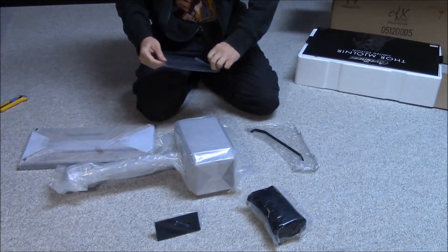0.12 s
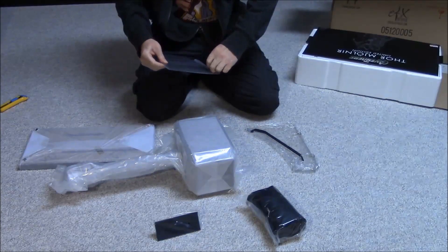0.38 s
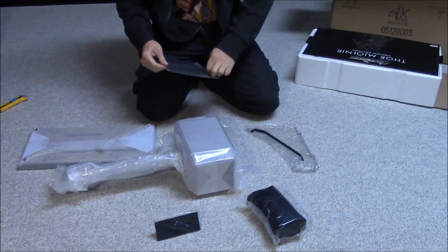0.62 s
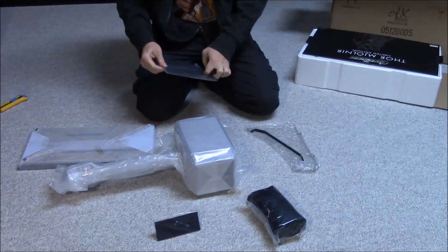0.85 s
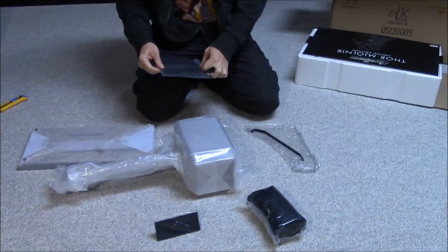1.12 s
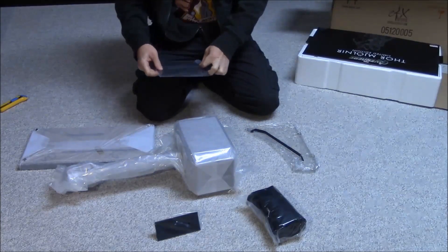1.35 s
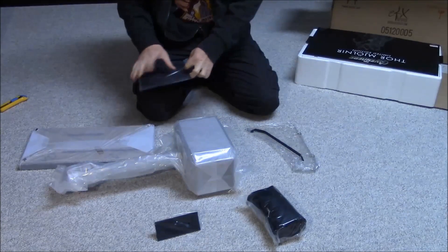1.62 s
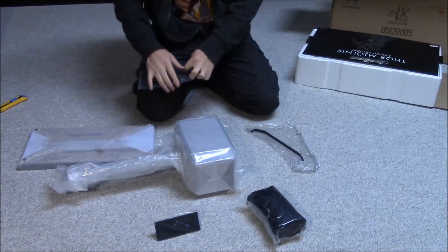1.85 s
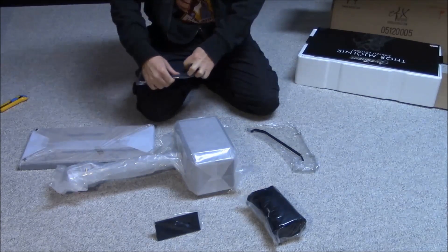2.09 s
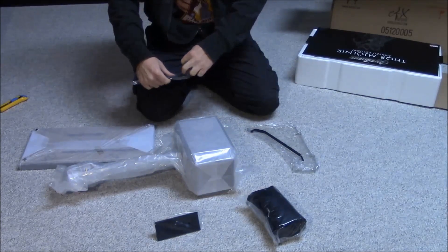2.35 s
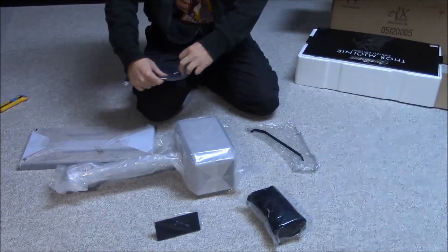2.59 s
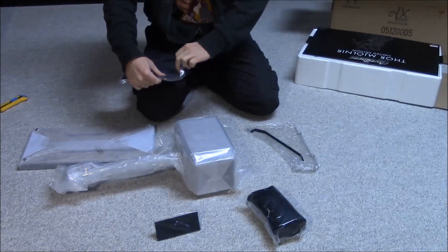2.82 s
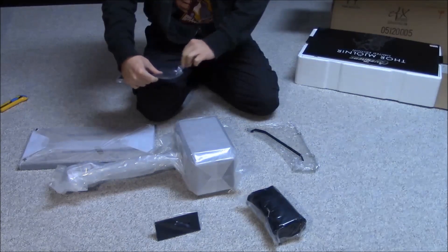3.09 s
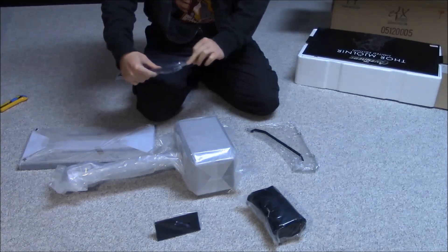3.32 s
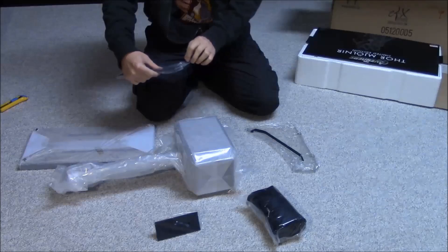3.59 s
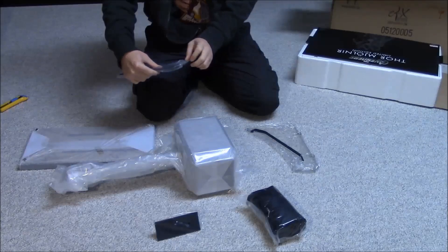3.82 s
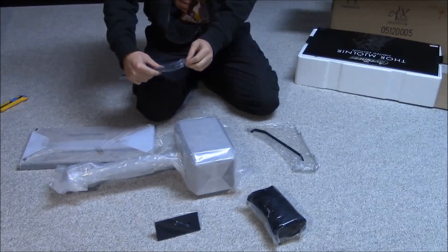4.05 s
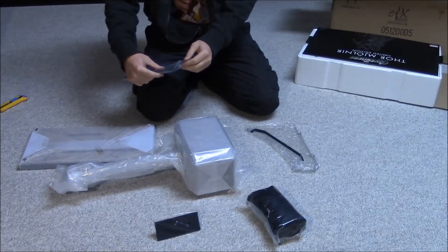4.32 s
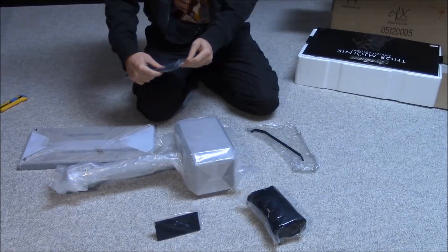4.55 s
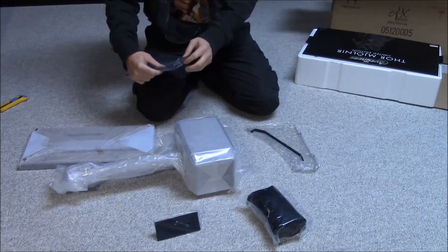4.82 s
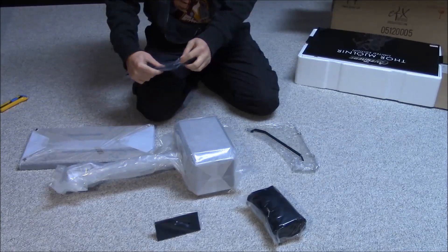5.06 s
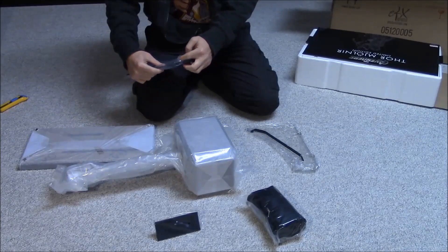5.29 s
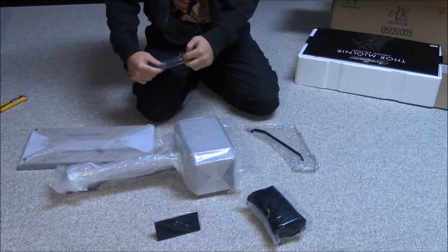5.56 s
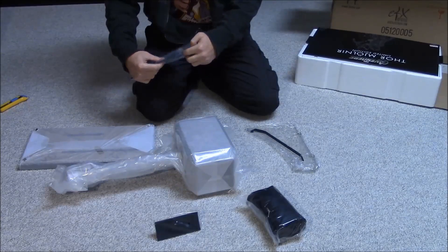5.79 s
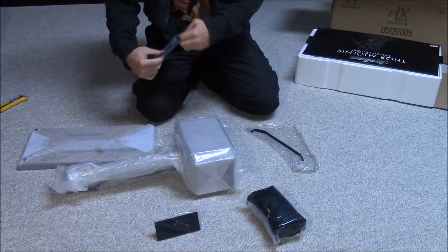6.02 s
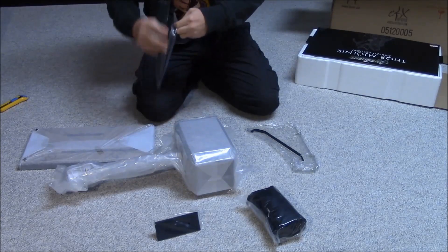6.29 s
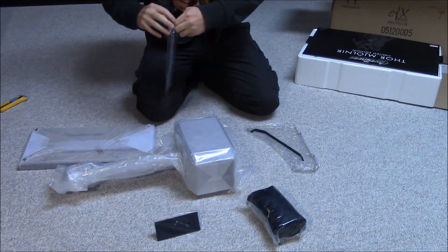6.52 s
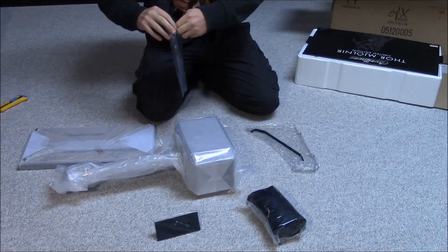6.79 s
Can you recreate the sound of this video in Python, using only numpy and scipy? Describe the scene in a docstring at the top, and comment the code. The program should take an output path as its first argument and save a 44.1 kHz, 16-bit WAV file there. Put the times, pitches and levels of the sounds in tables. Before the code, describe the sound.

Close stereo pickup of hands working a stiff plastic sleeve in a small, quiet carpeted room. Crisp separate snaps grow stronger, peak in a dense, bright crackling burst just after two seconds, then drop to soft dull crumples and light rustle. A small flurry of gentle crinkles returns near the end. A faint steady hush with a slight fuzzy whistling tone lies beneath.

```python
"""Sharp snaps and a papery rustle are heard over a steady hush with two fuzzy whistles, in a small quiet room.
Hands turn and peel a stiff plastic sleeve with papers in it, kneeling on carpet before a close microphone pair.
Each snap is a crease letting go: a gritty force pulse excites the ring of the film and the sleeve's low modes.
Rustle is filtered random ticks in clumps; floor, walls and ceiling return echoes and a dense tail.
The hush is shaped noise, partly alike at left and right."""
import sys
import numpy as np
from scipy import signal
from scipy.fft import rfft, irfft
from scipy.io import wavfile
from scipy.ndimage import uniform_filter1d

SR = 44100
rng = np.random.default_rng(int(sys.argv[2]) if len(sys.argv) > 2 else 0)


def amplitude_ratio(level_db):
    """Convert a level in decibels to the matching linear amplitude (field) ratio."""
    exponent = np.asarray(level_db, float) / 20
    return 10 ** exponent


def to_wav(sig):
    """Store sig (one row per channel, or 1-D mono) as 16-bit WAV at the path in sys.argv[1].

    Samples outside -1..1 are clipped; the rate is SR.
    """
    pcm = np.clip(np.atleast_2d(sig), -1, 1) * 32767
    pcm = np.round(pcm).astype(np.int16)
    wavfile.write(sys.argv[1], SR, pcm.T)  # frames by channels


N = 304290  # length in samples


def unit_rms(x):
    """Normalisation by mean power: scales to rms 1."""
    return x / np.sqrt(np.mean(x ** 2) + 1e-20)


def unit_peak(x):
    """Normalisation by amplitude: scales each row to peak 1."""
    return x / abs(x).max(-1, keepdims=True)


def match_energy(x, other):
    """Energy equality: gives each row of x the energy of the same row of other."""
    return x * np.linalg.norm(other, axis=1, keepdims=True) / np.linalg.norm(x, axis=1, keepdims=True)


def read(points, hz):
    """Interpolation along log frequency, clamped at the ends of the table."""
    table_hz, value = np.transpose(points)
    return np.interp(np.log(hz + 1), np.log(table_hz + 1), value)


def colour(x, spectrum):
    """Minimum-phase filtering: the log gain fixes the phase of a causal response."""
    log_gain = np.log(amplitude_ratio(read(spectrum, abs(np.fft.fftfreq(2048, 1 / SR)))))
    response = np.exp(np.conj(signal.hilbert(log_gain)))
    taps = np.fft.ifft(response).real[:1024]
    return signal.oaconvolve(x, taps[None], axes=1)[:, :x.shape[1]]


def pair(x, likeness):
    """Interaural coherence: mixes two unrelated signals into a left and right alike by frequency."""
    a, b = rfft(x)
    same = np.clip(read(likeness, np.fft.rfftfreq(x.shape[1], 1 / SR)), 0, 1)
    mid = np.sqrt((1 + same) / 2) * a
    side = np.sqrt((1 - same) / 2) * b
    return irfft(np.array([mid + side, mid - side]), x.shape[1])


# Spectrum of the room hush. Each row: frequency in Hz, relative density in dB.
HUSH_SPECTRUM = [(25, -20), (60, -18.5), (120, -4), (270, -3.5), (460, -5), (700, -7), (1160, -12),
                 (2000, -13.5), (5700, -20.5), (11300, -27.5), (15600, -36), (15900, -63)]
# Fuzzy lines over the hush. Each row: centre in Hz, width in Hz, amplitude added re the hush there in dB.
WHISTLE_LINES = [(952, 40, 12), (1630, 30, 4)]
# Coherence of the hush. Each row: frequency in Hz, left-right likeness from 0 to 1.
HUSH_LIKENESS = [(60, 0.04), (180, 0.3), (550, 0.36), (1650, 0.75), (4970, 0.62), (15000, 0.83)]
HUSH_DB = -63  # rms


def hush():
    """Stationary noise: white noise takes the hush spectrum, raised by two resonance-shaped lines."""
    hz = np.fft.rfftfreq(N, 1 / SR)
    lift = 1 + sum(amplitude_ratio(db) / (1 + ((hz - centre) / (width / 2)) ** 2) for centre, width, db in WHISTLE_LINES)
    white = rng.standard_normal((2, N))
    noise = irfft(rfft(white) * amplitude_ratio(read(HUSH_SPECTRUM, hz)) * lift, N)
    return amplitude_ratio(HUSH_DB) * unit_rms(pair(noise, HUSH_LIKENESS))


# Fingers shift their grip. Each row: time of the peak in seconds, length in seconds,
# then gains in dB of the flexing of the whole sleeve, the rustle and the fizz.
GRIP_SHIFTS = [(0.142, .1, -64.5, -77, -87), (0.45, .25, -82, -63.5, -62), (0.743, .12, -77, -61, -66),
               (0.853, .06, -62, -64.5, -84), (1.134, .08, -66, -60, -84), (1.669, .08, -62.5, -70.5, -65),
               (1.962, .1, -57.5, -67.5, -79), (2.082, .06, -65.5, -61.5, -65),
               (2.192, .12, -54.5, -54.5, -48), (2.566, 0.088, -53.5, -80, -61),
               (2.681, .1, -55.5, -73, -62), (2.87, .07, -81, -75, -66), (3.016, .08, -59, -75, -70),
               (3.227, .12, -66, -68, -65.5), (3.348, .08, -57.5, -63, -81),
               (3.816, .12, -68.5, -77.5, -74), (4.461, 0.23, -83, -70, -68.5), (4.659, .2, -67, -73, -80),
               (5.3, .15, -69.5, -73, -72), (5.406, 0.065, -58.5, -78, -81),
               (5.594, .12, -65.5, -73.5, -79), (5.898, .2, -60, -72, -66), (6.109, .08, -58, -70, -80),
               (6.223, .1, -61, -62.5, -73), (6.4, .06, -60, -69.5, -82), (6.498, .1, -72, -67, -69),
               (6.805, .08, -72, -77, -69)]
# The hands are never quite still: steady gains in dB of the flexing, the rustle and the fizz.
HOLD_GAINS = (-71.5, -83.5, -97.5)
GRIP_FADE_DB, RISE_SHARE = 13, 0.6  # fade over one length; the same rise takes this share of it


def handling():
    """Power addition: grips that swell and fade exponentially add to a steady hold."""
    peak_s, length_s, *levels = np.transpose(GRIP_SHIFTS)[:, :, None]
    t = np.arange(0, N + 64, 64) / SR
    falling = (t - peak_s) / length_s
    rising = (peak_s - t) / (RISE_SHARE * length_s)
    shape = amplitude_ratio(-GRIP_FADE_DB * np.maximum(falling, rising))
    gains = [np.sqrt(amplitude_ratio(hold) ** 2 + ((amplitude_ratio(db) * shape) ** 2).sum(0)) for hold, db in zip(HOLD_GAINS, levels)]
    return [np.interp(np.arange(N) / SR, t, gain) for gain in gains]


# Colour of the rustle. Each row: frequency in Hz, relative gain in dB.
RUSTLE_COLOUR = [(600, -10), (1500, 3.5), (3000, 4), (6000, 3.5), (9000, -29)]
# Colour of the higher fizz. Each row: frequency in Hz, relative gain in dB.
FIZZ_COLOUR = [(4000, -22.5), (7000, 4.5), (10000, 5.5), (13000, -11), (16500, -59)]
# Colour of the bending sleeve. Each row: frequency in Hz, relative gain in dB.
FLEX_COLOUR = [(80, -37), (220, 12), (400, 0.5), (650, -5.5), (1100, -9.5), (2500, -25)]


def rustle(flex, rub, fizz):
    """Shot noise: tiny creases of uneven size clump under the fingers, with dull bumps as the sleeve bends."""
    chance, size, sign = rng.random((3, 2, N))
    drift = uniform_filter1d(rng.standard_normal(N), size=300)
    clumps = amplitude_ratio(3.9 * unit_rms(drift))
    per_s = np.array([[1200.], [250.]]) * clumps  # creases, bumps
    heights = amplitude_ratio(-4.2 * np.log(size + 0.0055))
    ticks = (chance < per_s / SR) * heights * np.sign(sign - .5)
    creases, bumps = ticks[:1], ticks[1:]
    rubbing = rub * unit_rms(colour(creases, RUSTLE_COLOUR))
    fizzing = fizz * unit_rms(colour(creases, FIZZ_COLOUR))
    bending = flex * unit_rms(colour(bumps, FLEX_COLOUR))
    return rubbing + fizzing + bending


# A loosely held sleeve crumbles rather than snaps. Each row: time in seconds, share of grit.
SLACKNESS = [(0, 0.069), (2.3, 0.092), (2.6, 0.87), (4.0, 1), (5.7, 0.98), (6.9, 0.72)]
# Low modes of the sleeve. Each row: nominal frequency in Hz, nominal level in dB, t60 in seconds.
SLEEVE_MODES = [(258.5, -12, 0.062), (361, -24, 0.06), (463, -5, 0.03), (646, 3, 0.026), (1024, -4, 0.0063),
                (1257, 6, 0.0081), (1880, 6.5, 0.0027)]
STRAIN_S = 0.0011  # the film strains this long before a crease lets go
RING_Q = 3.0  # sharpness of the film's ring
SLACK_DULLS = 0.6  # how much a fully slack film loses above its ring
# Share of a snap thrown into the room, and what a fully slack sleeve, muffled by the hands, takes from it.
THROWN_DB, THROWN_SLACK_DB = -1, -3.5


def snaps(table):
    """Impulse excitation: a strained crease lets go in a gritty spike, rings the film and knocks the sleeve."""
    s, db, ring_hz, thud_db, crack_db = np.transpose(table)[:, :, None]
    t = np.arange(2048) / SR - STRAIN_S  # time from the spike
    after = np.maximum(t, 0)
    grit = np.interp(s, *np.transpose(SLACKNESS))

    straining = 0.03 * np.exp(t / 0.00024)
    releasing = np.exp(-after / 0.0001) + grit * np.exp(-after / 0.0028)
    envelope = np.where(t < 0, straining, releasing)
    push = 0.69 * np.exp(-after / 0.00063)
    force = rfft(envelope * (push + rng.standard_normal((len(table), 2048))))

    j_hz = 1j * np.fft.rfftfreq(2048, 1 / SR)
    u, v = j_hz / ring_hz, j_hz / 8000
    resonance = u ** 2 / (1 + u / RING_Q + u ** 2)
    film = 0.0043 + resonance * u / (0.46 + u) / (1 + u / 1.46)  # steep below the ring, gentle above
    film = film / (1 + SLACK_DULLS * grit * u)
    edge = (v ** 2 / (1 + 0.96 * v + v ** 2)) ** 2  # the crack: high-pass at 8 kHz
    ring, crack = unit_peak(irfft(force * film)), unit_peak(irfft(force * edge))

    taut = np.log2(ring_hz / 3500)  # taut film favours the upper modes of the sleeve
    grip = rng.random((len(table), len(SLEEVE_MODES), 2, 1))  # the hold shifts the modes and their shares
    thud = 0
    for k, (mode_hz, mode_db, t60) in enumerate(SLEEVE_MODES):
        level = mode_db + 10.5 * taut * np.log2(mode_hz / 700) - 12.0 * grip[:, k, 1]
        held_hz = mode_hz * (0.871 + 0.22 * grip[:, k, 0])
        thud = thud + amplitude_ratio(level - 60 * after / t60) * np.sin(2 * np.pi * held_hz * after)
    thud = amplitude_ratio(thud_db) * unit_peak(thud)
    sound = amplitude_ratio(db) * (0.62 * ring + amplitude_ratio(crack_db) * crack + thud)

    # summed over all directions the grit evens out to a smooth colour: ring and crack add as powers
    body = 0.68 * rfft(match_energy(irfft(film), ring))
    top = amplitude_ratio(crack_db) * rfft(match_energy(irfft(edge[None]), crack))
    phase = 1j * np.angle(body) - 2 * np.pi * j_hz * STRAIN_S
    even = irfft(np.hypot(abs(body), abs(top)) * np.exp(phase))
    thrown = amplitude_ratio(db + THROWN_DB + THROWN_SLACK_DB * grit) * (even + thud)

    place = rng.standard_normal((len(table), 1))  # where on the sleeve, left to right
    sides = []
    for sign in (1, -1):  # left, right: level and arrival time differ
        lead = np.exp(2 * np.pi * j_hz * sign * place * 2.5e-6)
        sides.append(irfft(rfft(sound) * amplitude_ratio(sign * (0.66 + 0.3 * place)) * lead))
    out = np.zeros((3, N + 2048))
    starts = np.round(s[:, 0] * SR).astype(int)
    for at, rows in zip(starts, np.stack([*sides, thrown], axis=1)):
        out[:, at:at + 2048] += rows
    return out[:2, :N], out[2:, :N]


FAINT_COUNT = 60
FAINT_DB, FAINT_SPREAD_DB = -50, 8  # level of the loudest, range below it
FAINT_HZ, FAINT_OCTAVES = 2900, 0.4  # middle of the rings, scatter either way
FAINT_THUD_DB, FAINT_CRACK_DB = -13.5, -32  # middles, re the snap's level


def faint(busy):
    """Random point process: rows for faint snaps, likelier where the fingers are busy."""
    when, size, ring, thud, crack = rng.random((FAINT_COUNT, 5)).T
    rate = np.sqrt(busy)
    s = np.interp(when, np.cumsum(rate) / rate.sum(), np.arange(N) / SR)
    level = FAINT_DB - FAINT_SPREAD_DB * size
    ring_hz = FAINT_HZ * 2 ** (FAINT_OCTAVES * (2 * ring - 1))
    return np.transpose([s, level, ring_hz, FAINT_THUD_DB + 20 * (thud - .5), FAINT_CRACK_DB + 20 * (crack - .5)])


# First returns of floor, walls and ceiling. Each row: delay in seconds, nominal level in dB.
EARLY_ECHOES = [(.002, -7), (.0064, -8), (.0083, -16), (.0113, -11), (.0123, -13), (.0134, -14),
                (.0152, -15), (.0189, -16), (.0224, -16)]
# Decay of the tail. Each row: frequency in Hz, t60 in seconds.
DECAY_TIMES = [(200, 0.6), (500, 0.18), (1300, 0.41), (2200, .27), (3300, 0.3), (5000, 0.29), (9000, 0.22),
               (15000, 0.34)]
# What the surfaces return. Each row: frequency in Hz, gain in dB.
SURFACE_COLOUR = [(200, -5.5), (1000, 8.5), (4000, 1), (8000, -4.5), (15000, -22)]
# Coherence of the tail. Each row: frequency in Hz, left-right likeness from 0 to 1.
TAIL_LIKENESS = [(60, .05), (180, 0.29), (550, 1), (1650, 1), (3000, 1), (5500, 0.89), (15000, 0.55)]


def room(x):
    """Reverberation: single early reflections, then a dense tail that dies exponentially band by band."""
    length = SR // 2
    early = np.zeros((2, length))
    for delay, db in EARLY_ECHOES:
        early[:, round(delay * SR)] = amplitude_ratio(db + 0.88 * rng.standard_normal(2))  # each a little from one side
    taps = rng.standard_normal((2, length))
    hz, t, bands = signal.stft(pair(taps, TAIL_LIKENESS), SR, nperseg=128)
    decay = amplitude_ratio(-60 * t / read(DECAY_TIMES, hz)[:, None])
    tail = signal.istft(bands * decay, SR, nperseg=128)[1][:, :length]
    tail *= np.clip((np.arange(length) / SR - 0.003) / 0.006, 0, 1)  # builds up as echoes multiply
    back = colour(early + amplitude_ratio(-0.5) * tail / np.linalg.norm(tail[0]), SURFACE_COLOUR)
    return signal.oaconvolve(x, back, axes=1)[:, :N]


# Crease snaps, and knocks where the sleeve's thud outweighs the film's ring (thud above 0 dB). # Each row:
# start of the strain in seconds, level in dB, ring of the film in Hz, # peak of the sleeve's thud in dB re that
# level, peak of the crack in dB re that level.
SNAPS_AND_KNOCKS = [(0.0479, -35.5, 3400, -8.5, -36), (0.0873, -31.5, 2980, -14, -38),
                    (0.1565, -37, 1750, -18, -27), (0.2614, -39.5, 2980, -16, 1),
                    (0.282, -25.5, 8730, -29, -17), (0.3246, -30, 4070, -18.5, -32),
                    (0.359, -28.5, 5460, -32, -27), (0.3847, -18.5, 6040, -37, -29),
                    (0.4265, -28.5, 3460, -23, -23), (0.4676, -40.5, 2030, -36, 5), (0.4905, -35, 3350, -10, 8),
                    (0.5555, -18, 4500, -31, 2), (0.6282, -35.5, 3500, -27, -32),
                    (0.6942, -24.5, 4280, -20, -37), (0.7105, -32.5, 4340, -17, -37),
                    (0.7686, -29.5, 4100, -17, 5.5), (0.855, -13.5, 5300, -23.5, 0.5),
                    (1.1113, -14, 6800, -20.5, -18), (1.1592, -16, 6100, -48, -28),
                    (1.3102, -38.5, 2070, -31, -25), (1.3414, -36.5, 2900, -25, -49),
                    (1.3826, -16.5, 4000, -27, 2.5), (1.6677, -15.5, 9100, -42, -22),
                    (1.6893, -9, 3260, -27, -1), (1.929, -29, 4070, -9.5, -25), (1.9324, -28.5, 2240, -28, -15),
                    (1.9494, -36.5, 2430, -34, 9), (1.9579, -6.5, 3650, -29.5, 6),
                    (2.0006, -15.5, 3480, -18, 6), (2.0574, -33, 3490, -27, 3), (2.0962, -12.5, 3720, -30, 4.5),
                    (2.1201, -7.5, 3300, -26, 1.5), (2.1366, -6, 3460, -43, -29), (2.1859, -3, 3150, -24, 2.5),
                    (2.1955, -2, 3300, -26, -8), (2.2051, -6, 3200, -31, -3), (2.2108, -13, 3300, -43, 9),
                    (2.2176, -8, 3130, -17, -6), (2.2264, -12, 3200, -24, 7), (2.2357, -5.5, 3200, -19, -1.5),
                    (2.3189, -24, 3200, -21, -23), (2.4069, -43.5, 2860, -23, 2),
                    (2.5255, -26.5, 3940, -1.5, -40), (2.5373, -29.5, 2840, -33, -26),
                    (2.593, -22.5, 5940, -19, -5), (2.6489, -36.5, 2110, -10, 3.5),
                    (2.6693, -33.5, 2370, -7, -9), (2.6931, -31, 5240, -31, -30), (2.7207, -37, 3330, -24, -20),
                    (2.9014, -47, 2000, -0.5, -27), (2.9944, -41.5, 5140, -19, 1),
                    (3.0027, -49, 3040, 6.5, -17), (3.0193, -48, 2150, 3.5, -10), (3.1014, -48, 2650, 1, -17),
                    (3.1214, -36.5, 3060, -3, -24), (3.1979, -33.5, 2530, -5, -18),
                    (3.2272, -28.5, 3730, -11, -14), (3.2394, -35, 5480, -16, -16), (3.3402, -42, 2240, 1, -27),
                    (3.3544, -58, 3040, 1, -18), (3.4405, -45.5, 2130, -6.5, -4),
                    (3.7994, -53.5, 2020, 5.5, -24.5), (3.8644, -57.5, 2650, -21.5, -1),
                    (4.4577, -39.5, 3480, -8.5, -25), (4.4721, -41, 3750, -19, -17),
                    (4.643, -44.5, 3110, -8, -25), (4.7083, -34.5, 3840, -6.5, -37),
                    (5.1003, -45, 3210, -5, -20.5), (5.2027, -45.5, 2240, -4, -14),
                    (5.4156, -41.5, 2730, -5.5, -9), (5.6115, -42, 2900, -1.5, -21),
                    (5.684, -41.5, 2170, -9, -34), (5.7729, -41, 2360, -3, -19),
                    (5.8277, -36.5, 2670, -6.5, -21), (5.8441, -33.5, 2760, -7, -6),
                    (5.8544, -28, 3440, -28, -30), (5.8674, -36, 2760, -4, -10),
                    (5.8795, -30.5, 3480, -29, -13), (5.901, -27, 2620, -23, -3),
                    (5.9598, -35.5, 2730, -7.5, -17), (5.9928, -41, 3240, -30, 5.5),
                    (6.0014, -39, 4030, -33, -21), (6.0767, -36.5, 2660, -26, -3.5),
                    (6.108, -39.5, 2400, -9, -22), (6.1948, -41.5, 2850, -4, -25),
                    (6.248, -37.5, 3750, -20, -17), (6.279, -38, 3200, -33, -19),
                    (6.3785, -39.5, 2520, -6, -25), (6.4048, -43.5, 2500, -22, -5),
                    (6.465, -44.5, 3500, -12, -19), (6.4947, -38.5, 3100, -7, -27),
                    (6.5106, -37, 2560, -9, -27), (6.5555, -34.5, 2730, -24, -8),
                    (6.784, -41.5, 4500, -24, -27), (6.8724, -47, 3030, -7.5, -12)]
# Near sounds at the microphones. Each row: frequency in Hz, gain in dB.
MIC_RESPONSE = [(30, -28), (120, -19), (280, -0.5), (12000, -0.5), (14500, -9.5), (17000, -30),
                (22000, -11)]


def scene():
    """Superposition: direct and reflected snaps and rustle, thin in the bass, add to the hush."""
    background = hush()
    flex, rub, fizz = handling()
    fingers = rustle(flex, rub, fizz)
    direct, thrown = snaps(np.vstack([SNAPS_AND_KNOCKS, faint(rub)]))
    reflected = room(thrown + amplitude_ratio(-0.5) * fingers)
    return colour(direct + fingers + reflected, MIC_RESPONSE) + background


def low_pass(x):
    """Removes everything above the highest recorded frequency."""
    return signal.sosfilt(signal.butter(12, 16990, fs=SR, output="sos"), x)


def record(dry):
    """Soft saturation: the input flattens peaks smoothly towards a ceiling."""
    ceiling = 0.46  # of full scale
    mix = ceiling * np.tanh(dry / ceiling)
    return low_pass(mix)


dry = scene()
out = record(dry)
to_wav(out)
```